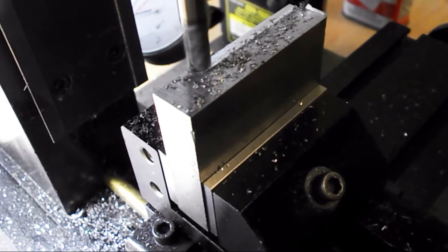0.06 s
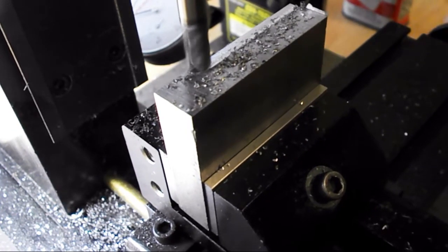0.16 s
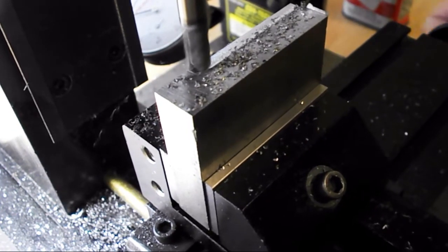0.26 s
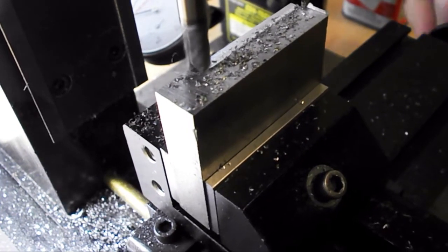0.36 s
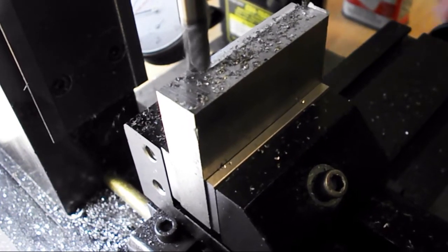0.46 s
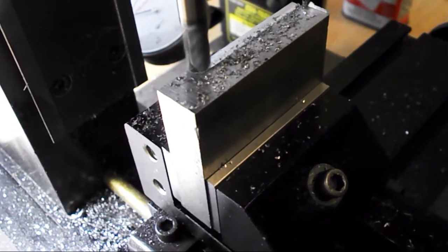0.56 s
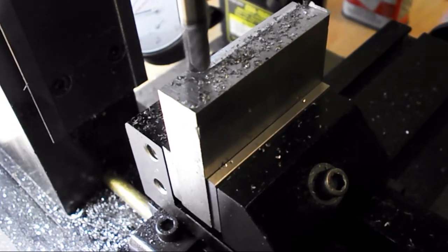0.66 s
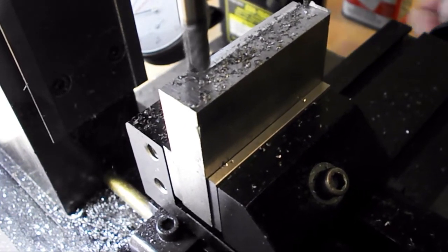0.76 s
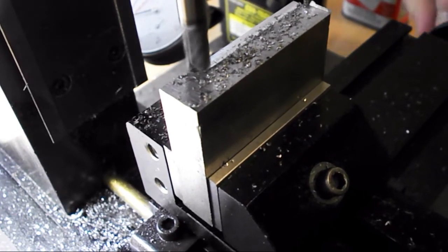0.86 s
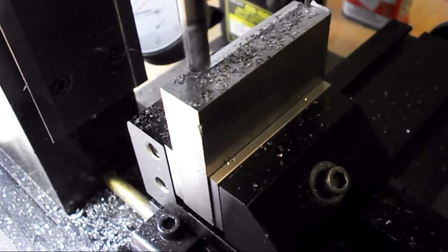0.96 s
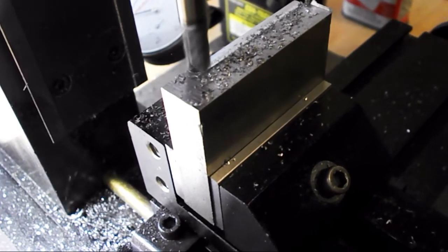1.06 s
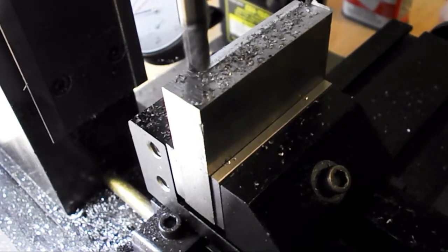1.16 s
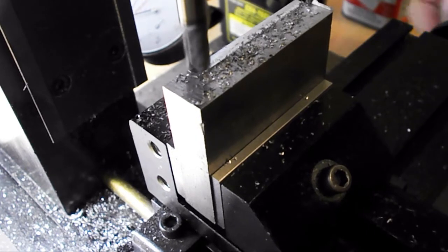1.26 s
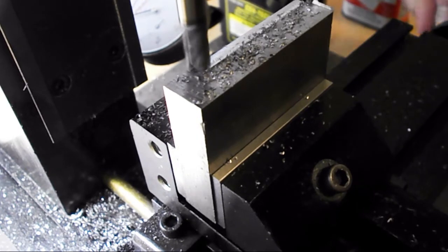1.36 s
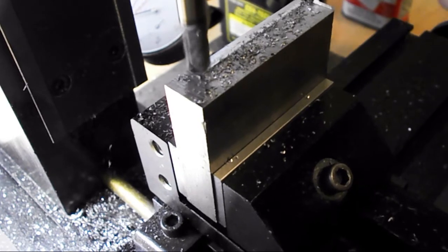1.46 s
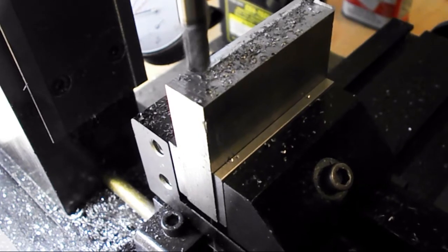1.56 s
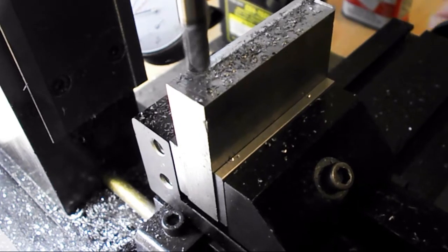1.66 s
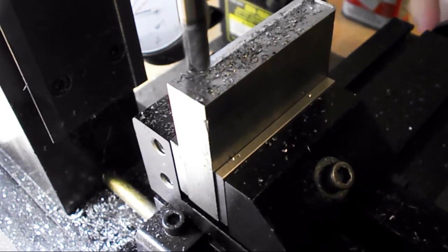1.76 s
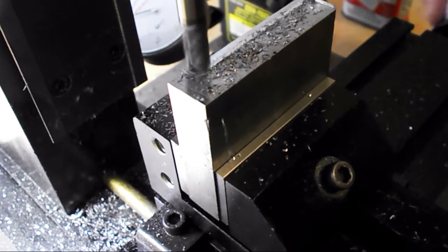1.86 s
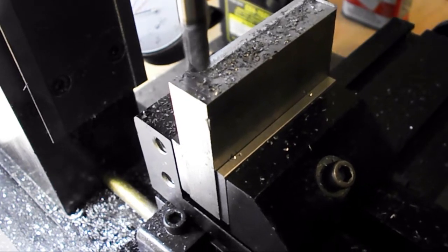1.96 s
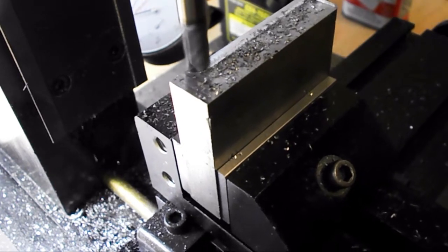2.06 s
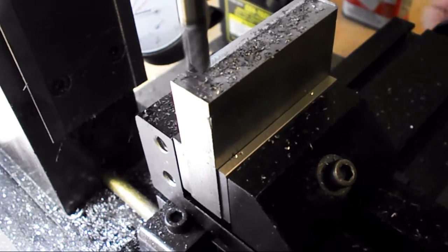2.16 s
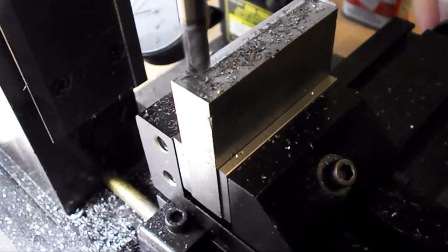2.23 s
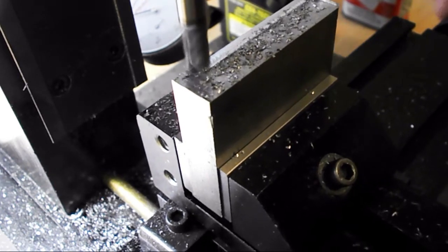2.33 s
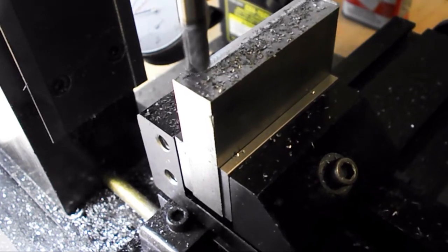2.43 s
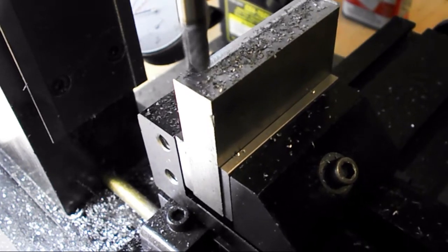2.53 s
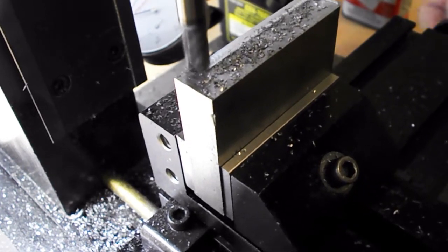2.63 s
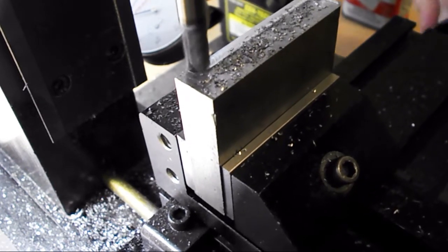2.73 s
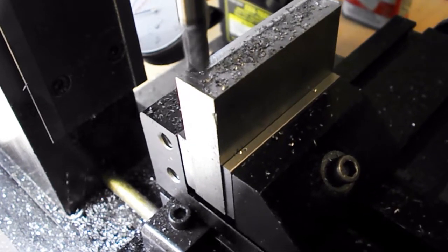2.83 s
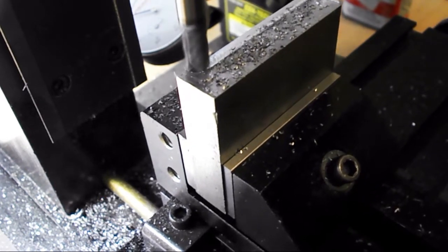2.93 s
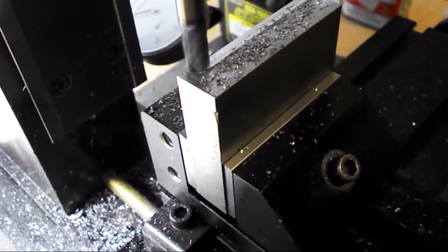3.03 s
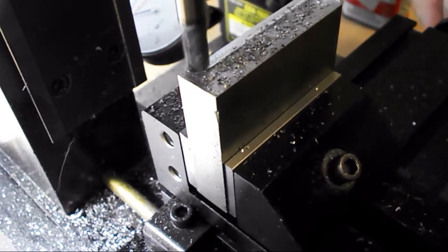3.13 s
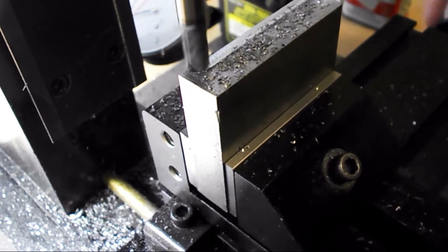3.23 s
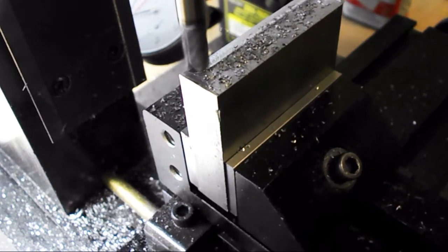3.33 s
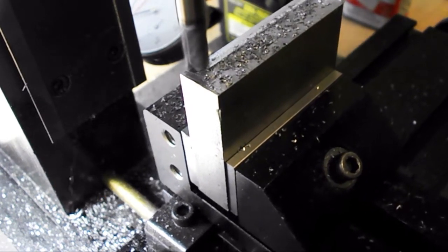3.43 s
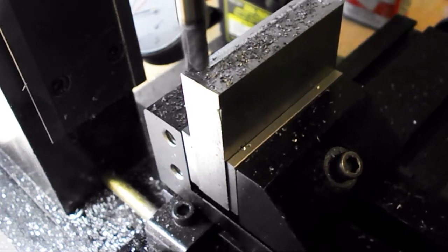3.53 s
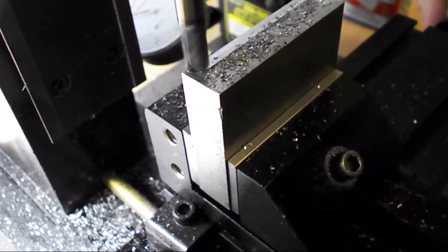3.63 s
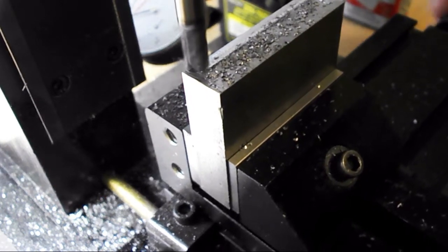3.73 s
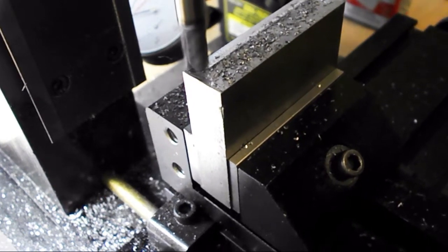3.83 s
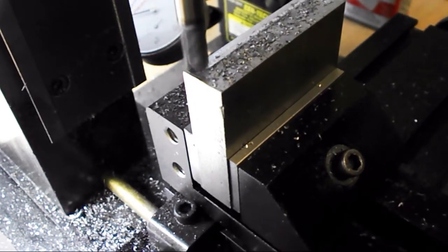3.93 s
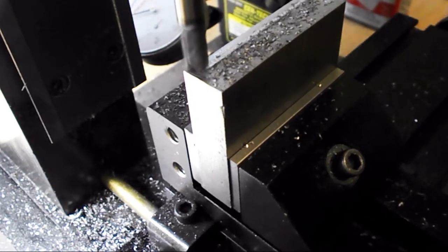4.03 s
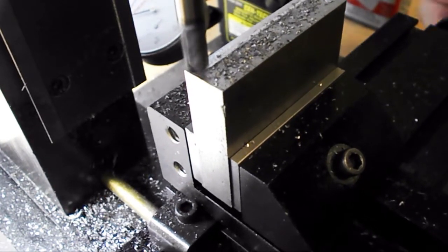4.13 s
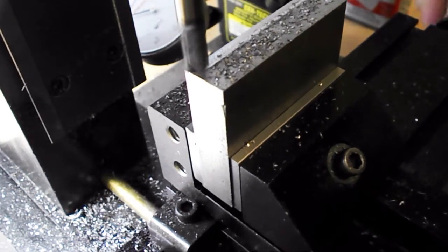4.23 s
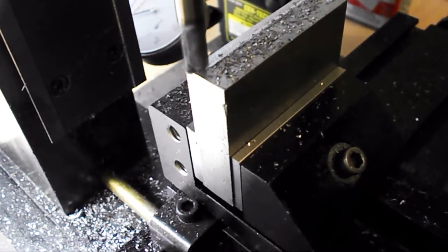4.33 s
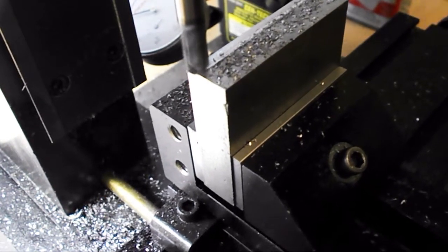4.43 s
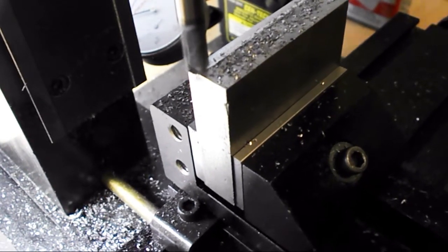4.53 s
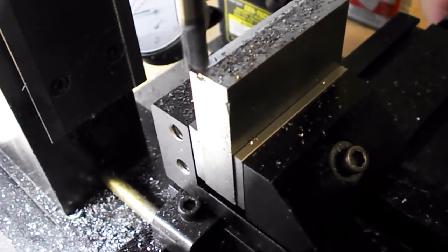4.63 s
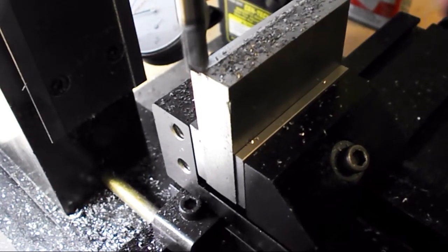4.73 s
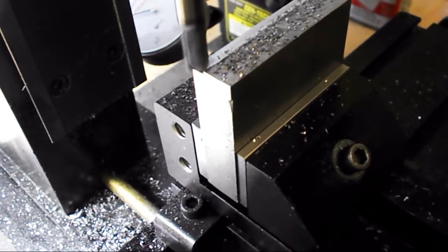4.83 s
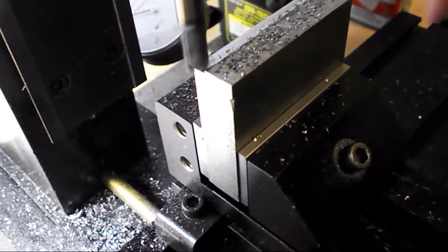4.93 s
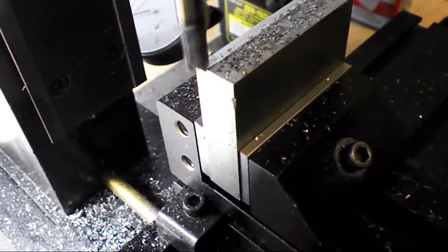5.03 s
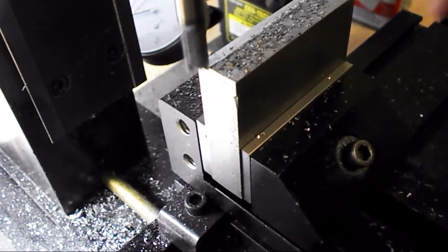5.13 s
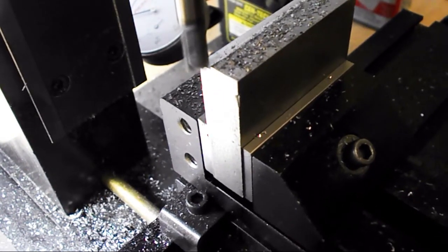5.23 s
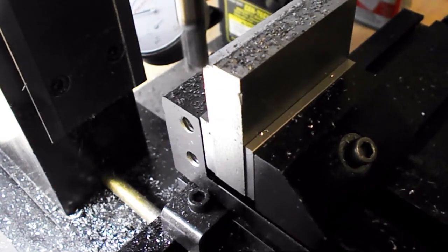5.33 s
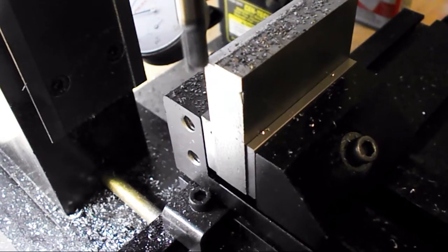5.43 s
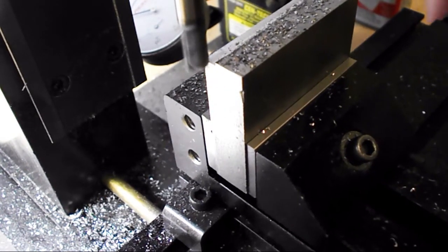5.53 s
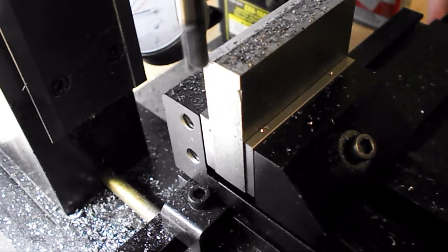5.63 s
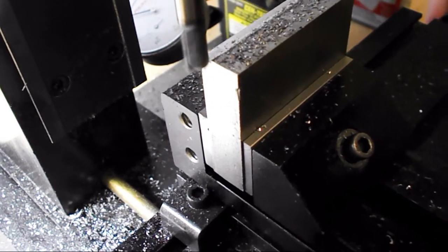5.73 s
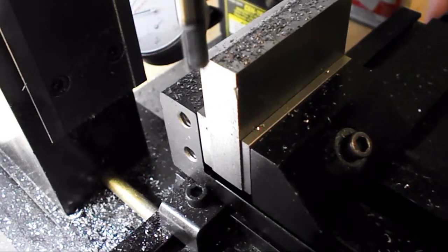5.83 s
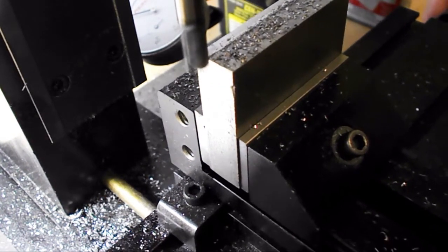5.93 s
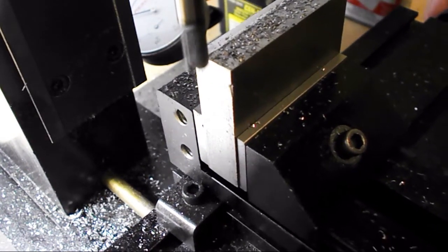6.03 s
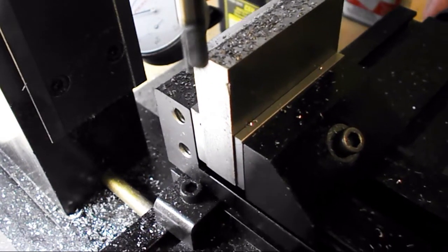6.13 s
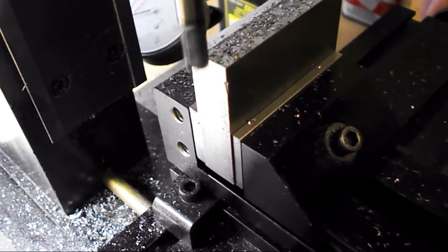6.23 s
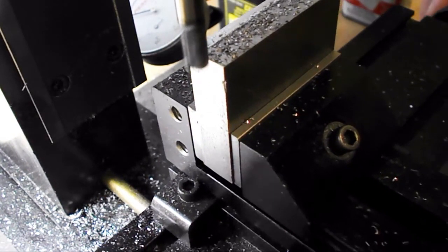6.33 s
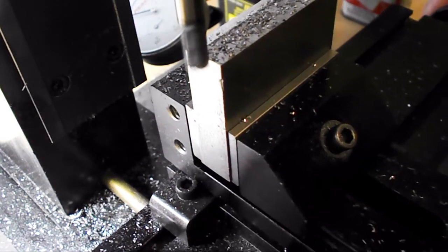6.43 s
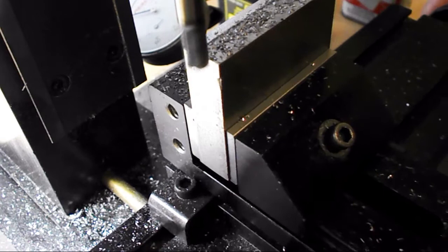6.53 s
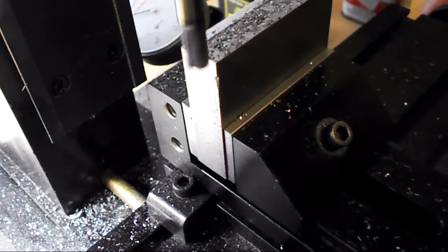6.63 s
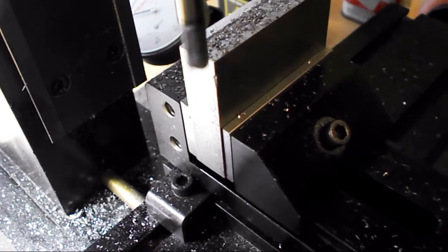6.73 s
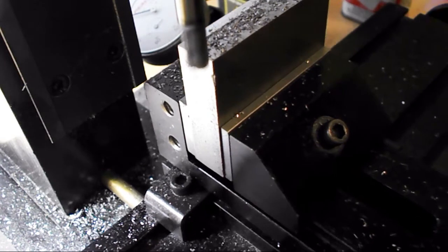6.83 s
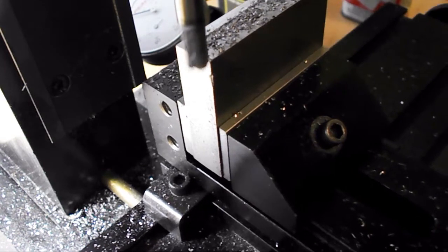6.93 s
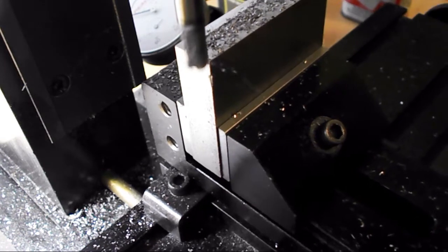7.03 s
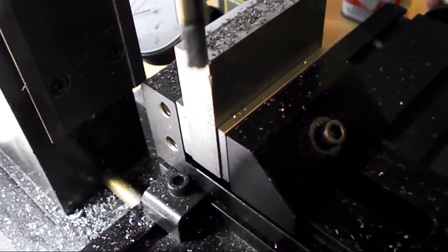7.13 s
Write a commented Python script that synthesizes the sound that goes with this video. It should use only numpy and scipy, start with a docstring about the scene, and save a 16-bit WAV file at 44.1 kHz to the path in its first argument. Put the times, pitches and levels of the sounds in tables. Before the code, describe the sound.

Close-up milling of a steel block: steady grinding chatter and metallic ringing, a brief rattling exit, soft motor whine, and an abrupt return of cutting.

```python
"""A workshop, close by a small milling machine: a four-flute cutter shaves a steel block fed by a hand crank,
runs off its end, spins free, then bites again. Each flute thuds into the frame (filtered blows), scrapes
(noise through resonances) and rings the cutter; near the block's end flutes snag with short clacks.
The motor hums in tones on the mains ripple, gears whine with the spindle, the housing whirs in shaped noise,
a slack idler rattles, and loose chips tick."""
import sys
import numpy as np
from scipy.fft import rfft, irfft, next_fast_len
from scipy.io import wavfile
from scipy.ndimage import uniform_filter1d, map_coordinates

SR = 44100
rng = np.random.default_rng(int(sys.argv[2]) if len(sys.argv) > 2 else 0)


def store_wav(level_fs):
    """Save 16-bit WAV to argv[1]."""
    pcm = np.round(np.clip(np.atleast_2d(level_fs), -1, 1) * 32767)
    wavfile.write(sys.argv[1], SR, pcm.T.astype(np.int16))


N = 317079

# Bite of each flute. Each row: level in dB.
FLUTES = [-4.5, -5.5, -4.5, -5]
# Narrow cutter modes, heard at the block's edge and when a hard bite strikes the cutter.
# Each row: centre in Hz, width in Hz, relative level in dB.
SQUEAL = [(5750, 610, -14), (5650, 210, -7), (6580, 150, -1.5), (7200, 180, -8.5)]
ROTOR = 1.849  # motor turns per spindle turn
IN_STEP_S = 6.12  # when the two tones near 960 Hz, which beat together, are in phase


def amp(db):
    """dB to gain."""
    return 10 ** (np.asarray(db) / 20)


def unit(x):
    """x at rms 1."""
    return x / np.sqrt(np.mean(x ** 2) + 1e-20)


def along(points, hz):
    """Interpolate (Hz, value) points on a log frequency axis."""
    f, v = np.transpose(points)
    return np.interp(np.log(hz + 1), np.log(f + 1), v)


def curves(rows):
    """One value per sample for each column after the time."""
    s, *cols = np.transpose(rows)
    return [np.interp(np.arange(N) / SR, s, c) for c in cols]


def wobble(rate):
    """A smooth random curve, rate knots a second."""
    knots = rng.standard_normal(int(N * rate / SR) + 4)
    return map_coordinates(knots, [np.arange(N) * rate / SR])


def filtered(x, response):
    """x shaped by a complex response of frequency."""
    m = next_fast_len(N + SR // 2)
    return irfft(rfft(x, m) * response(np.fft.rfftfreq(m, 1 / SR)), m)[..., :N]


def modes(table):
    """The causal response of a few resonances, alternating in sign."""
    return lambda f: sum((-1) ** k * amp(db) * 1j * f * w / (c * c - f * f + 1j * f * w)
                         for k, (c, w, db) in enumerate(table))


def blend(share, a, b):
    """An equal-power fade from a to b, each first set to rms 1."""
    angle = np.pi / 2 * np.clip(share, 0, 1)
    return np.cos(angle) * unit(a) + np.sin(angle) * unit(b)


def spindle_speed():
    """Mean speed in turns per s, rising as the cut thins and sagging with each push on the crank."""
    # Each row: time in seconds, mean speed in turns per second.
    mean_speed = [(0, 36.48), (.4, 36.57), (3.5, 36.58), (3.9, 36.74), (4.2, 37.0), (4.6, 37.8),
                  (4.95, 38.22), (5.25, 38.2), (5.6, 38.49), (6.95, 38.49), (7.19, 36.95)]
    # Hardest pushes of the hand on the crank. Each row: time in seconds.
    push_s = [.08, .58, 1.11, 1.59, 2.05, 2.53, 2.99, 3.52, 3.93]
    sag = .11  # turns per s that a full push takes off, and the slack between gives back
    t = np.arange(N) / SR
    pushes = np.interp(t, push_s, np.arange(len(push_s)))
    last_s = push_s[-1]
    fade = np.interp(t, [last_s - 1, last_s], [1, .5]) * np.interp(t, [last_s, last_s + .5], [1, 0])
    return curves(mean_speed)[0] - sag * fade * np.cos(2 * np.pi * pushes)


def spindle_turns():
    """Turns of the spindle, counted from the moment the tones are in step."""
    turns = np.cumsum(spindle_speed()) / SR
    return turns - turns[round(IN_STEP_S * SR)]


def bites(turns, scatter_db, sharpness):
    """Force on the flutes: a jump as each enters the steel, a fall as its chip thins, a new size each time."""
    passes = len(FLUTES) * (turns - turns[0])
    flute = passes.astype(int)
    scatter = np.clip(rng.standard_normal(N // 100), -3, 1.6)
    size_db = np.array(FLUTES)[flute % len(FLUTES)] + scatter_db * scatter[flute]
    return amp(size_db) * np.exp(-sharpness * (passes - flute))


def tearing(turns, scatter_db, sharpness, grain_db, rate):
    """Noise that follows each bite, in grains."""
    grains = amp(grain_db * wobble(rate) + 0.4 * wobble(25.17))
    return bites(turns, scatter_db, sharpness) * grains * rng.standard_normal(N)


def cutter(turns):
    """Blows sound as tones on the flute rate; the tearing chip is noise in the parts that it shakes."""
    # Layer levels. Each row: time in seconds, then thud, scrape, cutter ring, swarf and low flute pull in dB.
    cut_levels = [(0, -39, -40, -43, -44.5, -51), (.8, -39, -41, -42, -45, -52.5),
                  (1.5, -40, -39.5, -40, -44.5, -51.5), (1.75, -38, -41, -42.5, -45, -53),
                  (2.4, -39.5, -39.5, -42, -45, -50), (3.6, -38, -40.5, -42.5, -45, -53.5),
                  (4.05, -40, -40, -39.5, -44, -50), (4.3, -41, -42, -44, -43, -55),
                  (4.5, -38, -40.5, -47, -45, -49.5), (4.75, -39.5, -43.5, -47.5, -47, -52),
                  (4.9, -38, -39, -40, -43, -47), (5.01, -39.5, -42.5, -36.5, -45.5, -63),
                  (5.08, -40, -46.5, -36, -46, -52), (5.13, -48.5, -50, -37, -45.5, -57),
                  (5.39, -47.5, -49, -36.5, -48.5, -54), (5.5, -60, -65, -42, -54, -65),
                  (5.56, -70, -65, -54, -68, -68), (5.6, -73, -67, -67, -70, -69),
                  (6.965, -40.5, -45, -53, -45, -60), (7.0, -36, -39, -42, -45, -50),
                  (7.04, -38, -42.5, -45, -48, -46), (7.1, -40.5, -42, -40, -52, -61),
                  (7.19, -43.5, -40.5, -42, -49, -49)]
    # Overhang past the block's end. Each row: time in seconds, share 0-1.
    overhang = [(0, .05), (4.2, 0.07), (4.45, 0.37), (4.8, 0.43), (5.1, 1), (5.5, 0.98), (6.95, 0.04),
                (7.05, 0.34), (7.19, 0.1)]
    # Start and end in seconds of the run with the cutter touching nothing.
    free_s = (5.6, 6.9605)
    # Answer to a blow, of the frame and of the thin end wall. Each row: frequency in Hz, relative level in dB.
    frame = [(60, -70), (146, -38), (293, -24), (440, -14.5), (587, 4), (730, -8), (880, -10.5),
             (1030, -54), (1500, -47), (2200, -76)]
    end_wall = [(60, -70), (150, -40), (305, -28), (460, -4), (610, 6), (765, 3), (920, 0), (1230, 0.5),
                (1550, -3), (2500, -35), (6000, -92)]
    # Chips torn off. Each row: frequency in Hz, relative density in dB per Hz.
    swarf_shape = [(3000, -18), (5000, -1), (7500, 0), (8300, -1), (9000, -4.5), (9900, -0.5),
                   (11500, -8.5), (13000, -14), (16000, -84)]
    # Resonances of table and column, block and vice, end wall, cutter, and side flutes as they enter.
    # Each row: centre in Hz, width in Hz, relative level in dB.
    column_modes = [(229.3, 34, -10), (361, 34, -12.5), (572.4, 48.5, 1.5), (685, 25, -2.5),
                    (717, 65, -5.5), (1130, 220, -9)]
    block_modes = [(1306, 233, -3), (1593, 108, 1), (2110, 333, -1.5), (2344, 198, 1.5), (3190, 810, -5),
                   (4200, 970, -23)]
    wall_modes = [(1220, 710, -5), (2290, 280, 0), (2750, 240, -9.5), (3100, 170, -4), (4470, 1000, -9)]
    cutter_modes = [(5560, 210, -5.5), (6020, 270, -6), (6670, 224, 3.5), (7350, 340, -5)]
    entry_modes = [(5730, 400, -6), (6120, 310, 2)]

    # each layer wanders on its own: 0.56 dB, 14 knots per s
    thud_db, scrape_db, ring_db, swarf_db, pull_db = (db + 0.56 * wobble(14) for db in curves(cut_levels))
    edge, t = curves(overhang)[0], np.arange(N) / SR
    twist = np.maximum.accumulate(turns + 0.0052 * wobble(20))  # the cutter winds up and lets go

    blows = np.diff(bites(twist, scatter_db=2.0, sharpness=1.1), prepend=0) * amp(0.88 * wobble(13))
    frame_thud = filtered(blows, lambda hz: amp(along(frame, hz)))
    wall_thud = filtered(blows, lambda hz: amp(along(end_wall, hz)))
    thud = blend(edge, frame_thud, wall_thud)

    column_noise = tearing(twist, scatter_db=3.0, sharpness=1.0, grain_db=0.2, rate=200)
    growl = unit(filtered(column_noise, modes(column_modes)))
    block_noise = tearing(twist, scatter_db=0.5, sharpness=0.82, grain_db=1.7, rate=300)
    scrape = filtered(block_noise, modes(block_modes))
    wall_noise = tearing(twist, scatter_db=3, sharpness=0.45, grain_db=2.5, rate=280)
    rasp = filtered(wall_noise, modes(wall_modes))
    rub = tearing(twist, scatter_db=0.5, sharpness=0.86, grain_db=3.5, rate=500)
    ring = blend(edge, filtered(rub, modes(cutter_modes)), filtered(rub, modes(SQUEAL)))
    chip_noise = tearing(twist, scatter_db=1.5, sharpness=0.16, grain_db=2.5, rate=650)
    swarf = unit(filtered(chip_noise, lambda hz: amp(along(swarf_shape, hz))))
    struck_ring = unit(filtered(blows, modes(cutter_modes)))  # each entering flute also strikes the cutter
    entry_ring = unit(filtered(rub, modes(entry_modes))) * (t > free_s[1])
    stroke = 2 * np.pi * len(FLUTES) * twist
    pull = np.sin(2 * stroke) + amp(-11.0) * np.sin(stroke)

    cut = amp(thud_db) * thud
    cut = cut + amp(thud_db - 3.5 - 0.47 * edge) * growl
    cut = cut + amp(scrape_db) * blend(edge, scrape, rasp)
    cut = cut + amp(ring_db) * ring
    cut = cut + amp(swarf_db) * swarf
    cut = cut + amp(ring_db - 8 - 5.4 * edge) * struck_ring
    cut = cut + amp(ring_db - 1.5) * entry_ring
    cut = cut + np.sqrt(2) * amp(pull_db) * pull
    cut = filtered(cut, lambda hz: 1 / (1 + (110 / (hz + 1)) ** 4))  # the small frame radiates no deep bass
    return cut * ((t < free_s[0]) | (t > free_s[1]))


def catches(turns):
    """Twice a turn a flute snags the end wall and snaps free: a short two-mode clack with a noise crack."""
    # Snags, pitched by where the wall is struck. Each row: time in seconds, level in dB, pitch in Hz.
    snags = [(4.32, -44, 2300), (4.36, -24, 2250), (4.43, -24.5, 2270), (4.48, -27, 2400),
             (4.55, -22, 2750), (4.63, -28, 2280), (4.68, -44, 2310), (4.72, -26.5, 2400),
             (4.78, -25, 2850), (4.85, -31, 2490), (5.09, -36, 2230)]
    longest_at_s = 4.556  # a moment when the longest flute snags
    opposite_db, scatter_db = -2, 2  # the flute across from it; spread from snag to snag
    upper_ratio, upper_db = 1.166, -5.5  # second mode over the first
    out, t = np.zeros(N + SR), np.arange(SR // 50) / SR
    halves = np.floor(2 * (turns - turns[round(longest_at_s * SR)]))
    starts = np.flatnonzero(np.diff(halves)) + 1
    starts = starts[(starts > snags[0][0] * SR) & (starts < snags[-1][0] * SR)]
    level_db, pitch_hz = curves(snags)
    for i in starts:
        db = level_db[i] + opposite_db * (halves[i] % 2) + rng.normal(0, scatter_db)
        phase = 2 * np.pi * pitch_hz[i] * (1 + 0.059 * rng.standard_normal()) * t
        tones = np.sin(phase) + amp(upper_db) * np.sin(upper_ratio * phase)
        crack = 0.27 * rng.standard_normal(len(t)) * amp(-60 * t / 0.0037)
        envelope = amp(db - 60 * t / 0.013) * (1 - np.exp(-t / 0.00037))  # falls 60 dB in 13 ms
        out[i:][:len(t)] += envelope * (tones + crack)
    return out[:N]


def dips():
    """Gain of the cut: it drops at once at each dip, then climbs back exponentially."""
    # Each row: start in seconds, depth in dB.
    drops = [(0.076, 2.5), (.294, 1.5), (1.032, 1), (1.144, 3), (1.361, 0.5), (1.648, 2), (1.854, 3),
             (2.56, 3), (2.708, 3.5), (3.85, 6), (4.066, 4), (4.175, 1), (4.478, 8), (4.56, 3),
             (4.748, 2.5), (4.886, 11), (4.978, 3)]
    recovery_s = 0.029  # time constant
    t = np.arange(N) / SR
    return amp(-sum(db * (t > s) * np.exp(-np.abs(t - s) / recovery_s) for s, db in drops))


def pings():
    """A hard bite strikes the cutter once; its tip rings out in a few milliseconds."""
    # Each row: start in seconds, peak in dB.
    hard_bites = [(0.04, -22), (0.3739, -27), (0.5656, -26), (0.948, -28), (1.0569, -25.5), (1.119, -28),
                  (1.516, -27), (1.6795, -29), (1.7199, -24), (1.7638, -28), (2.146, -22.5), (2.555, -27),
                  (2.6433, -23), (3.0813, -30), (3.2977, -27), (3.9817, -28), (4.0173, -21), (5.1925, -24),
                  (6.9604, -30), (6.9671, -30), (6.973, -20), (6.9804, -22), (6.9874, -22), (7.0145, -25),
                  (7.0622, -24), (7.1043, -26), (7.117, -20.5)]
    blows, one = np.zeros(N), np.arange(N) == 0
    for s, db in hard_bites:
        blows[round(s * SR)] = amp(db)
    peak = np.abs(filtered(one, modes(SQUEAL))).max()
    return filtered(blows, modes(SQUEAL)) / peak


def motor(turns):
    """Mains ripple tones, shaken once per rotor turn, and gear tones that follow the spindle."""
    ripple_hz = 119.87
    # Each row: multiple of the ripple, rms in dB before load, whine and wander.
    hum_tones = [(1, -70), (2, -54.5), (4, -49), (6, -56), (8, -59), (10, -67), (22, -82), (48, -80),
                 (50, -65), (52, -81), (54, -80)]
    # Each row: multiple of the spindle, rms in dB before load and wander.
    gear_tones = [(9.93, -73), (14.93, -71), (19.68, -72), (25, -59), (33.3, -73), (41.31, -70),
                  (43.1, -72), (43.16, -69), (45.63, -72), (46.86, -71), (47.48, -72), (48.09, -71),
                  (49.24, -69), (49.32, -64), (51.17, -73), (98.5, -79)]
    # Swell of the high whine. Each row: time in seconds, lift in dB.
    whine = [(0, -6), (5, -7), (5.55, 2), (5.9, -1), (6.3, -1), (6.55, 2), (6.7, 1), (6.9, 3), (7, 0)]
    t = np.arange(N) / SR - IN_STEP_S
    speed = spindle_speed()
    load = (speed.max() - speed) / np.ptp(speed)  # 1 at the slowest
    rotor = 2 * np.pi * ROTOR * turns
    whine_db = curves(whine)[0]
    throb = 1 + 0.082 * np.cos(rotor)
    sway = .08 * np.sin(rotor)  # radians
    hum = gears = 0
    # cutting load presses the teeth together and damps the gear tones and the higher hum tones
    for k, db in hum_tones:
        damping_db = 7.5 * load * np.log2(k / 4).clip(0, 1)
        level_db = db + 0.84 * wobble(5) + (k > 40) * whine_db - damping_db
        hum = hum + amp(level_db) * np.sin(2 * np.pi * k * ripple_hz * t + k % 8 + sway)
    for k, db in gear_tones:
        level_db = db + 0.65 * wobble(9.7) - 4.7 * load
        gears = gears + amp(level_db) * np.sin(2 * np.pi * k * turns + k % 25)
    return np.sqrt(2) * (throb * hum + gears)


def whir(turns):
    """Fan, brushes and bearings: noise in the housing, shaken by the rotor and the spindle."""
    # Each row: frequency in Hz, relative density in dB per Hz.
    air_shape = [(30, -72), (100, -40), (200, -7), (400, -7), (900, -6.5), (1080, -18.5), (1280, -3),
                 (1400, -6.5), (1700, -2), (2400, -8.5), (2800, -15), (5200, -19), (10500, -15.5),
                 (13000, -19), (16000, -86)]
    # Housing resonances. Each row: centre in Hz, width in Hz, lift in dB.
    housing = [(3900, 600, 5), (5950, 300, 5), (6640, 250, 7), (8380, 400, 7)]
    shake = 1 + 0.093 * np.cos(2 * np.pi * ROTOR * turns) + 0.08 * np.cos(2 * np.pi * turns)
    lift_db = lambda hz: sum(db / (1 + (2 * (hz - c) / w) ** 2) for c, w, db in housing)
    noise = shake * amp(0.93 * wobble(120)) * rng.standard_normal(N)
    air = filtered(noise, lambda hz: amp(along(air_shape, hz) + lift_db(hz)))
    return amp(-51.0 + 0.88 * wobble(7.8)) * unit(air)


def rattle(turns):
    """A slack idler gear, three rotor turns to one of its own, knocks each time round and chatters after."""
    # Case wall by the idler, then gear case. Each row: centre in Hz, width in Hz, relative level in dB.
    wall_modes = [(1750, 250, -6), (2340, 220, -1)]
    case_modes = [(1320, 170, -5), (1660, 283, -6), (1820, 150, -3.5), (2400, 77, 4), (3870, 340, -3)]
    idler = ROTOR * turns / 3
    knock = np.diff(np.floor(idler), prepend=np.floor(idler[0])) * amp(2.3 * wobble(30))
    chatter = np.exp(-7 * (idler % 1)) * amp(1.9 * wobble(40)) * rng.standard_normal(N)
    knocks = amp(-63) * unit(filtered(knock, modes(wall_modes)))
    return knocks + amp(-66.0) * unit(filtered(chatter, modes(case_modes)))


def chips():
    """A chip falls on steel: a short ping with a crack."""
    # Each row: start in seconds, relative level in dB, pitch in Hz.
    falls = [(5.636, -37, 8100), (5.7433, -37, 8420), (5.822, -33, 10100), (6.0177, -36, 6620),
             (6.1484, -34, 6560)]
    out, t = np.zeros(N + SR), np.arange(SR // 20) / SR
    for s, db, hz in falls:
        ping = np.sin(2 * np.pi * hz * t) * amp(-60 * t / 0.015)  # falls 60 dB in 15 ms
        crack = 2.0 * rng.standard_normal(len(t)) * amp(-60 * t / .012)
        out[round(s * SR):][:len(t)] += amp(db - 9.0) * (ping + crack)
    return filtered(out[:N], modes([(9000, 5000, .5)]))


def scene():
    """Cutter, motor, gears and chips at one microphone."""
    turns = spindle_turns()
    cut = dips() * (cutter(turns) + catches(turns)) + pings()
    machine = motor(turns) + whir(turns) + rattle(turns)
    return (cut + machine + chips())[None]


def record(dry):
    """Microphone noise, a limiter, a port that cancels a narrow treble band, a bass cut and the band limit."""
    # Microphone noise. Each row: frequency in Hz, relative density in dB per Hz.
    hiss_shape = [(20, 0), (70, -6), (150, -2), (1000, 0), (16000, -17)]
    top_hz, ceiling_db, climb_db_per_s = 15800, -22, 90
    hiss = filtered(rng.standard_normal(N), lambda hz: amp(along(hiss_shape, hz)))
    x = dry + amp(-62) * unit(hiss)
    # each peak over the ceiling pulls the gain down within a millisecond; it climbs back at a steady rate
    over_db = np.maximum(20 * np.log10(np.abs(x) + 1e-9) - ceiling_db, 0)
    climb_db = climb_db_per_s * np.arange(N) / SR
    cut_db = np.maximum.accumulate(over_db + climb_db, axis=1) - climb_db
    x = x * amp(-uniform_filter1d(cut_db, size=45, axis=1))
    notch_db = lambda hz: -40 / (1 + (2 * (hz - 14020) / 400) ** 2)
    bass_cut = lambda hz: 1 / (1 + (70 / (hz + 1)) ** 2)
    return filtered(x, lambda hz: amp(notch_db(hz)) * bass_cut(hz) * (hz < top_hz))


dry = scene()
out = record(dry)
store_wav(out)
```